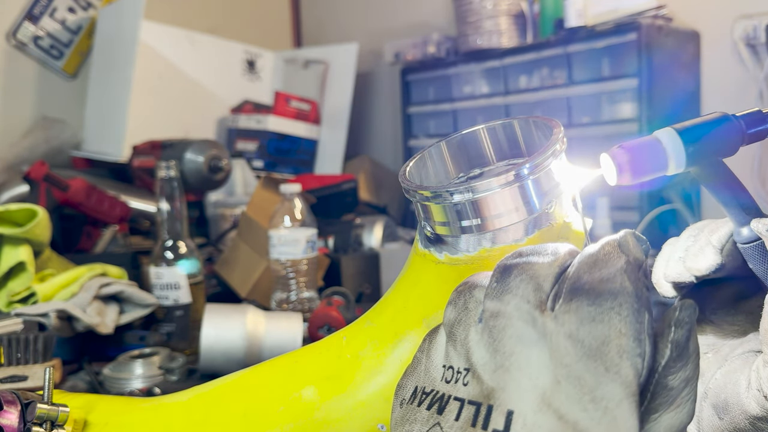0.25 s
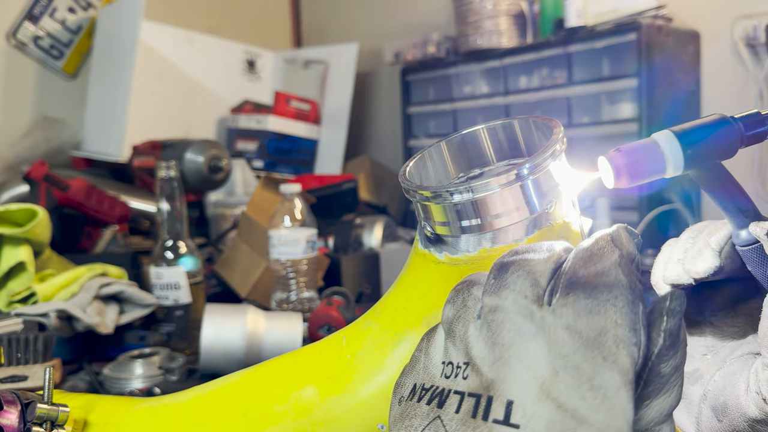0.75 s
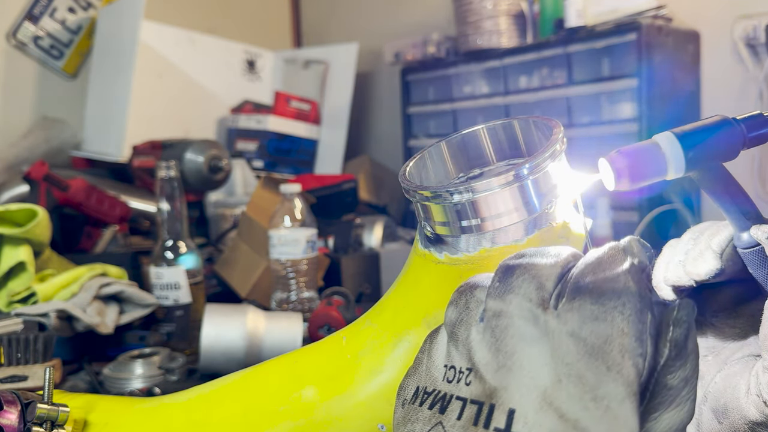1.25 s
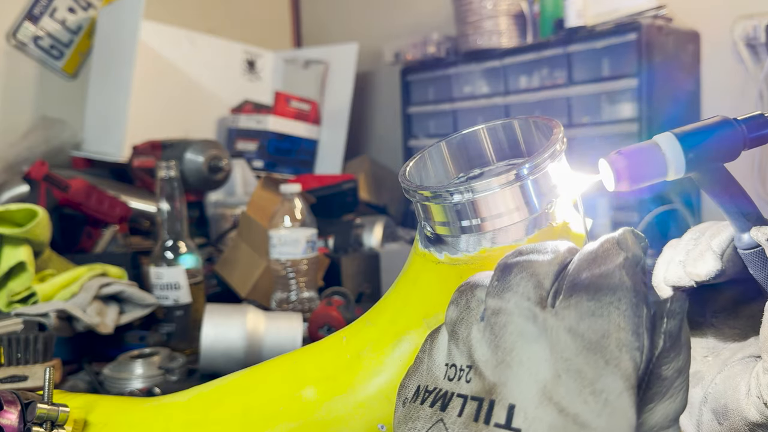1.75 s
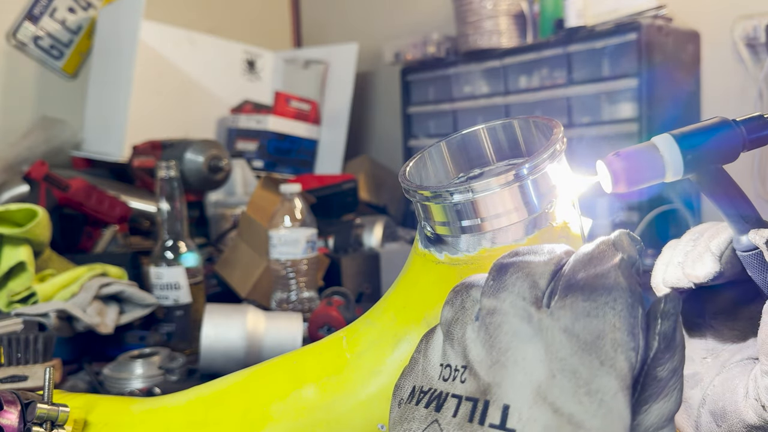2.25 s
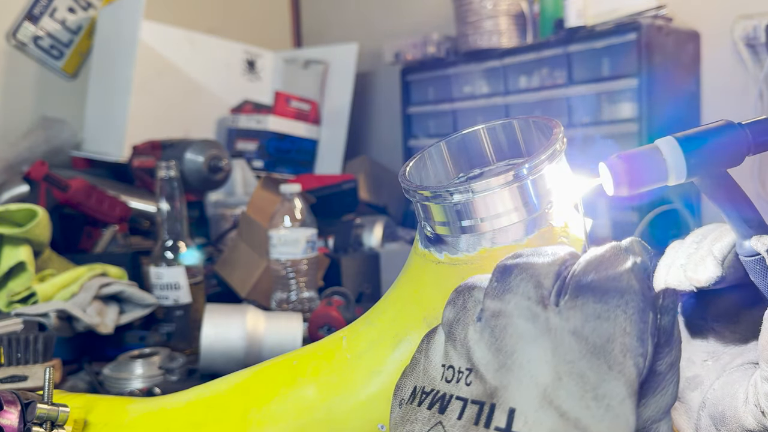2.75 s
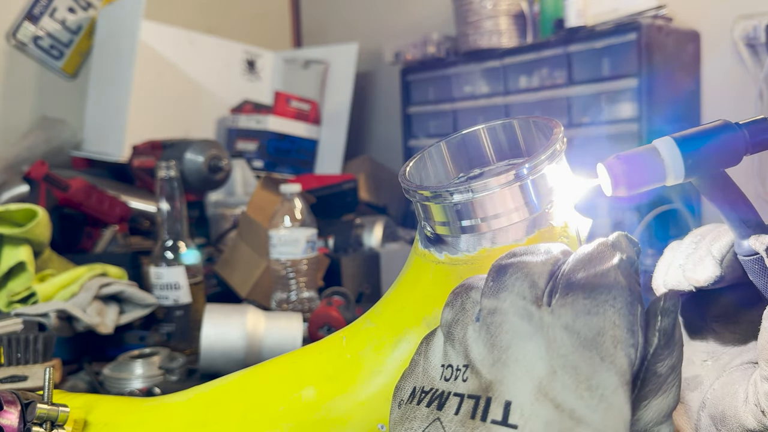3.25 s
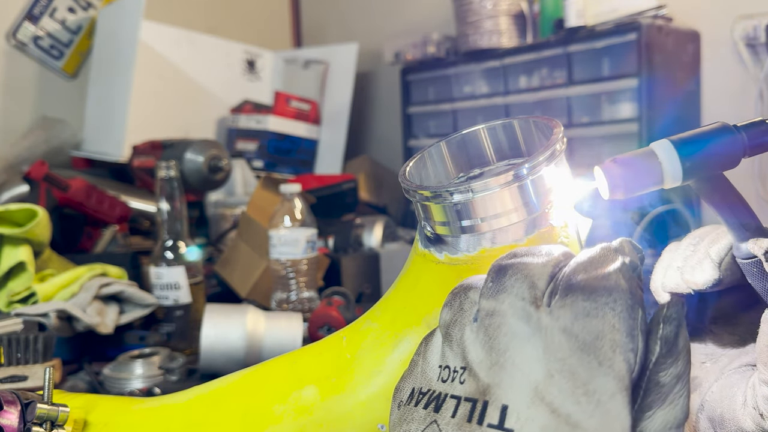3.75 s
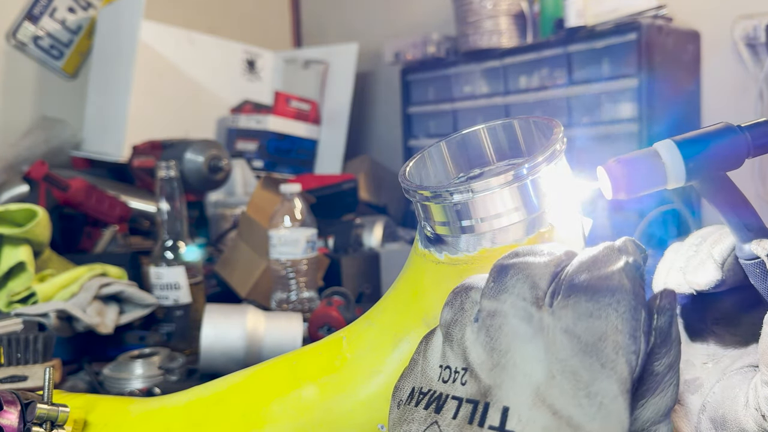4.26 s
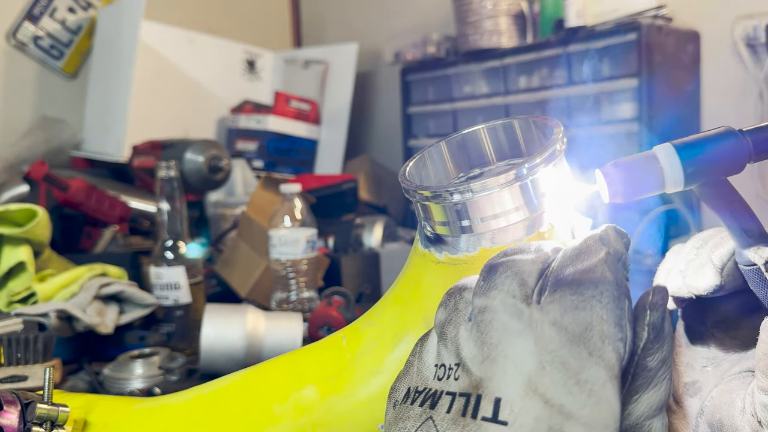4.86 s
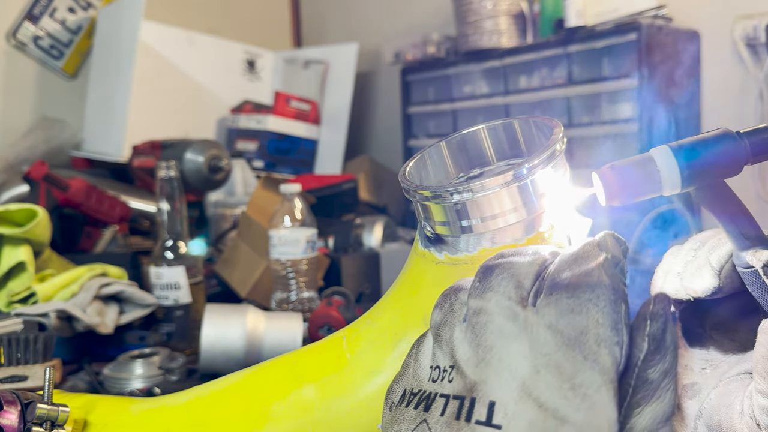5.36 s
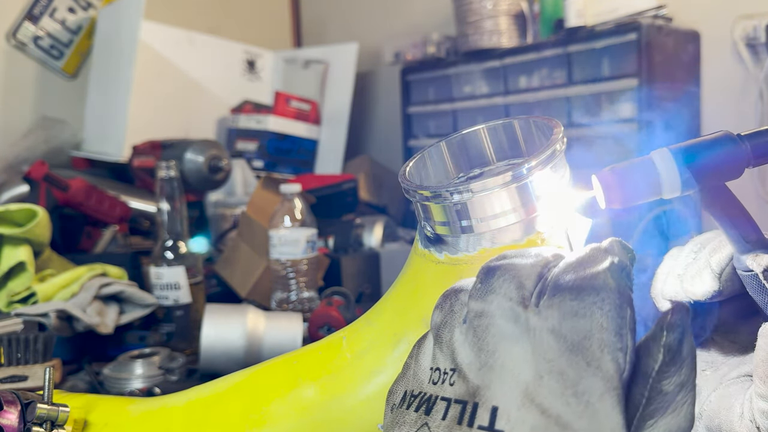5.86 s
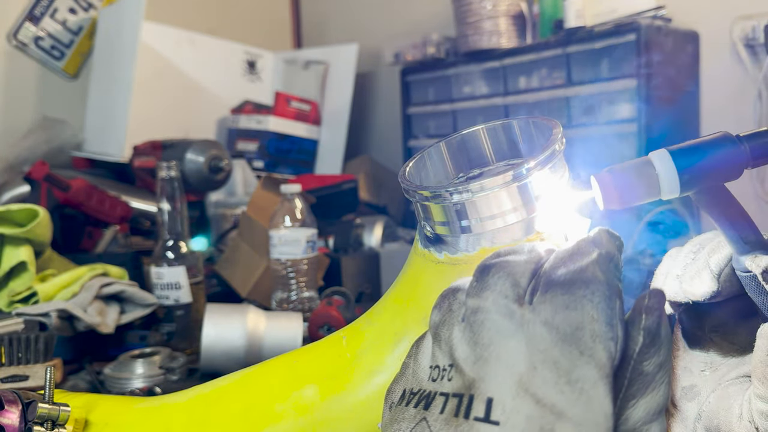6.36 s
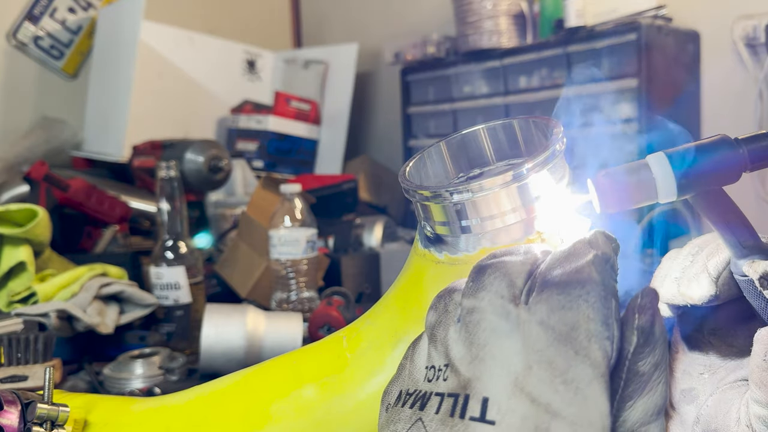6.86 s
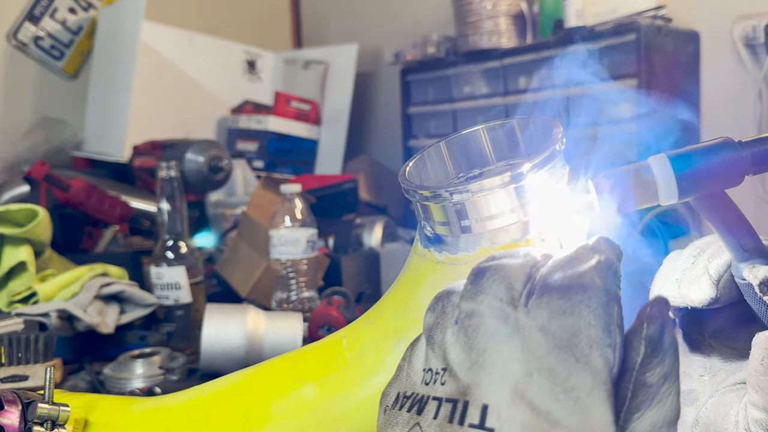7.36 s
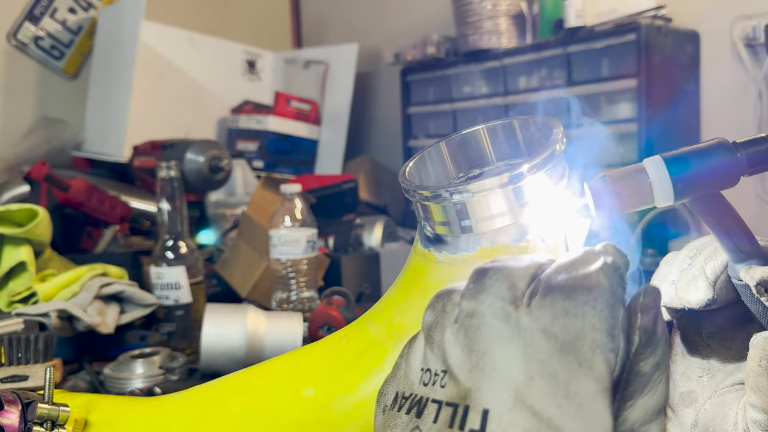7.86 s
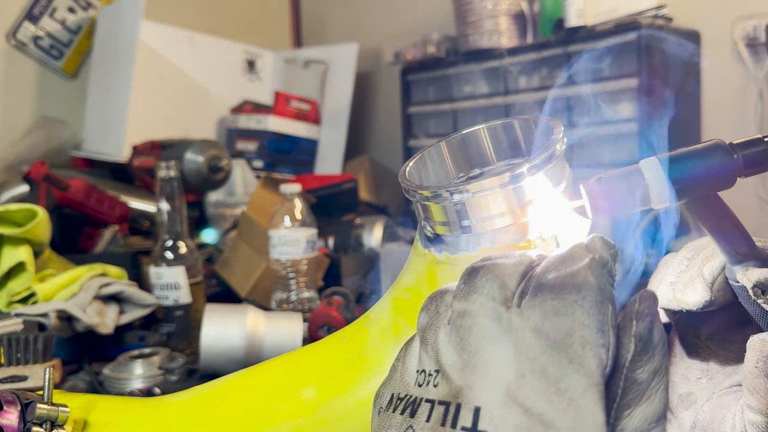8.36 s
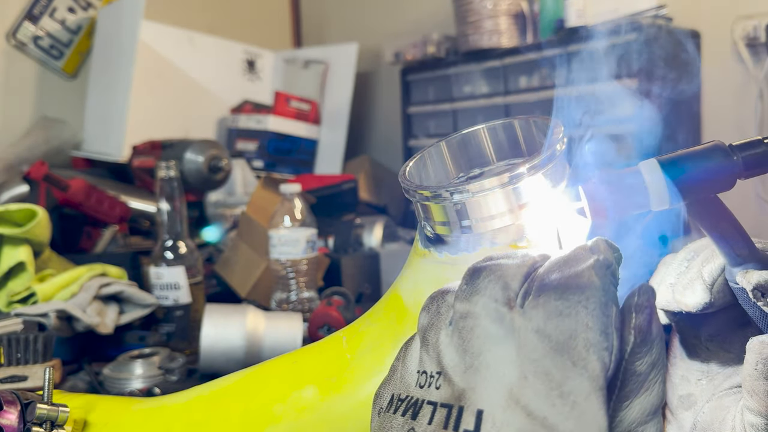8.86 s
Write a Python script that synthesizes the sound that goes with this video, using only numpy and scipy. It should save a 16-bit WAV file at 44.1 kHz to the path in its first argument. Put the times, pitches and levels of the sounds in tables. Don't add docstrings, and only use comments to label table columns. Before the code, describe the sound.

A close, loud welding arc buzzes harshly without pause over hissing gas, with faint machine hum and soft glove bumps on the bench later.

```python
import sys
import numpy as np
from scipy import signal
from scipy.fft import rfft, irfft, next_fast_len
from scipy.io import wavfile
from scipy.ndimage import uniform_filter1d

SR = 44100
rng = np.random.default_rng(int(sys.argv[2]) if len(sys.argv) > 2 else 0)


def int16_out(signal):
    q = np.round(np.clip(np.atleast_2d(signal).T, -1, 1) * 32767)
    wavfile.write(sys.argv[1], SR, q.astype(np.int16))


def ratio(d):
    e = np.asarray(d, float) / 20
    return 10 ** e


N = 401751
ARC_HZ = 120.2598
FILTER_SIZE = 2048

# time in seconds, level in dB.
ARC_LEVEL = [(0.0, -22), (1.37, -21.5), (2.2, -23), (2.79, -21.5), (4.06, -23.5), (4.31, -21.5),
             (5.2, -23.5), (6.24, -22), (6.57, -23), (7.59, -22), (7.97, -23), (9.11, -22)]
# time in seconds, place (0 seam start, 1 half way, 2 near the glove, 3 tilted over).
TORCH_PATH = [
    (0, 0),
    (1.2, 0),
    (5.0, 1),
    (7.3, 2),
    (7.75, 2),
    (7.95, 3),
    (9.11, 3),
]
# frequency in Hz, left level in dB, right level in dB.
SNAP_COLOUR = [(660, -86.5, -80.5), (1225, -69, -72), (1786, -82, -67.5), (2388, -66, -57),
               (3760, -45.5, -52.5), (4650, -51.5, -51.5), (7540, -57, -50.5), (7930, -51.5, -42.5),
               (9980, -50, -51), (10490, -53, -42), (12800, -50, -50), (14910, -53, -49.5),
               (16950, -66.5, -88.5)]
# frequency in Hz, gain in dB.
SECOND_COLOUR = [(700, 13), (2000, 19.5), (4000, -0.1), (6500, 3), (9000, -9.5), (12000, -8), (14500, -4),
                 (15700, 8)]
# frequency in Hz, left delay in ms, right delay in ms.
BAND_DELAY = [(1000.0, 0.234, 0.181), (3000.0, 0.057, 0.213), (5500.0, 0.262, 0.195),
              (7000.0, 0.191, 0.103), (8500.0, -0.725, -0.346), (10000.0, 0.031, -0.294),
              (15700.0, 0.069, -0.267)]
# delay in ms, signed gain at torch places 0, 1, 2 and 3.
LEFT_ECHOES = [(0.0, -1.01, -1.08, -1.02, -0.73), (0.096, -0.029, -0.016, -0.37, -0.54),
               (0.24, 0.36, 0.51, 0.43, 0.23), (0.324, -0.05, -0.2, -0.095, 0.094),
               (0.426, -0.66, -0.64, -0.49, -0.41), (0.486, -0.067, -0.093, -0.08, 0.13),
               (0.546, -0.49, -0.37, -0.58, -0.56), (0.648, -0.2, -0.2, -0.045, 0.025),
               (0.768, -0.2, -0.21, -0.34, -0.25), (0.846, 0.29, 0.2, 0.21, 0.2),
               (0.948, -0.19, -0.041, 0.3, 0.31), (1.032, 0.2, 0.28, 0.37, 0.33),
               (1.11, -0.33, -0.37, -0.19, -0.061), (4.164, 0.057, -0.016, -0.018, 0.0099),
               (6.228, 0.16, 0.1, -0.15, -0.14), (6.324, 0.3, 0.2, 0.17, 0.11),
               (6.45, 0.088, 0.011, 0.27, 0.17)]
# delay in ms, signed gain at torch places 0, 1, 2 and 3.
RIGHT_ECHOES = [(0.0, -0.82, -0.91, -1.1, -0.87), (0.088, 0.56, 0.57, 0.39, 0.18),
                (0.331, 0.23, 0.43, 0.27, 0.27), (0.417, -0.26, -0.25, -0.15, -0.073),
                (0.546, -0.081, -0.054, -0.16, -0.088), (0.632, -0.26, -0.085, -0.019, -0.12),
                (0.702, 0.095, 0.12, 0.13, 0.17), (0.948, -0.11, 0.14, 0.076, 0.037),
                (1.02, 0.16, 0.12, 0.15, 0.24), (1.148, 0.31, 0.14, 0.13, 0.089),
                (2.076, -0.29, -0.071, 0.06, 0.01), (4.165, 0.23, 0.1, 0.094, 0.057),
                (6.163, -0.01, -0.33, -0.16, -0.17), (6.22, -0.23, -0.14, -0.084, -0.035),
                (6.384, -0.00056, -0.088, 0.11, 0.062), (8.004, -0.067, -0.08, -0.25, -0.19)]
# time in seconds, treble change in dB.
SPITTING_SNAPS = [(0.153, 2), (1.55, -5), (2.706, 4), (3.596, 5), (3.621, 5.1), (3.696, 3.5), (3.978, 5),
                  (4.053, 4), (4.153, 6), (4.328, 3), (4.386, 4), (4.91, 7), (5.483, 5), (5.633, 4),
                  (5.907, -7), (6.215, 4), (7.072, -7), (7.113, 6), (7.853, -6), (7.895, 7), (7.978, 4),
                  (8.069, 5), (8.361, -3.6), (8.585, 4), (8.643, -7), (8.884, -3.3)]
# frequency in Hz, density in dB per Hz.
GAS_SPECTRUM = [(600, -21), (1000, -10.5), (1700, -6.5), (2200, -3.5), (4000, 2), (8000, 2.5), (9600, -1.5),
                (12000, -2.5), (13500, 3), (15500, -4)]
# frequency in Hz, width in Hz, depth (0-1) at the first
TORCH_DIPS = [(4150, 150, 1, 0.24), (9030, 410, 0.5, .2), (12650, 500, .7, 0.4), (15000, 1800, 0.7, 0.44),
              (5860, 100, 0.45, .05), (9360, 300, .4, .05)]
# frequency in Hz, density in dB per Hz.
SHOP_SPECTRUM = [(20, -19), (50, -21), (110, -11), (200, -1.5), (300, -6), (500, -16.5), (1200, -29.5)]
# frequency in Hz, density in dB per Hz.
FAN_AIR_SPECTRUM = [(200, -25.5), (400, 2.5), (700, 3.5), (1200, -1.5), (2500, -25)]
# multiple of the arc rate, level in dB, left minus right in dB, throb share (0-1),
# rise over the weld in dB.
HUM_PARTIALS = [(1, -63, 3, .05, -2), (2, -54, -3.5, 0.11, -3), (3, -55.5, -3, 0.22, 3),
                (4, -72.5, -1, 0.24, 5), (5, -73, -2, 0.045, 3.5), (6, -70, -3, .05, 9.5),
                (8, -62.5, 1, .05, 0.1)]
# frequency in Hz, density in dB per Hz.
RUMBLE_SPECTRUM = [(15, -6), (40, -7.5), (80, -3.5), (130, -2), (300, -30)]
# middle in seconds, length in seconds, rumble level in dB.
GLOVE_SHIFTS = [
    (3.499, 0.93, -63),
    (4.05, .3, -64),
    (4.751, 0.72, -58),
    (5.55, .6, -61),
    (6.201, .9, -60),
    (7.1, 0.5, -55),
    (8.5, 1.7, -60),
]
# time in seconds, peak level in dB.
BENCH_KNOCKS = [(3.289, -40), (3.359, -41), (3.469, -35), (3.599, -48), (4.49, -38), (4.619, -40),
                (4.702, -34.5), (4.769, -37), (4.859, -37), (7.048, -49), (8.049, -41), (8.349, -44)]
# start in seconds, end in seconds.
SILENT_SPELLS = [(0.06, 0.24), (0.26, 0.42), (0.44, 0.96), (0.97, 1.4), (1.42, 1.55), (1.7, 1.77),
                 (1.79, 1.84), (1.86, 1.91), (1.93, 2.02), (2.04, 2.14), (2.2, 2.42), (2.44, 2.49),
                 (2.93, 2.98), (3.16, 3.21), (7.89, 7.92)]
# low edge in Hz, high edge in Hz, last time in seconds, share (0-1) of other frames thinned.
THIN_BANDS = [(3930, 4050, 3.3, .5), (9440, 9680, 1.42, .15), (12280, 13050, 9, .3), (15100, 16000, 4, .35)]


def table(rows):
    return np.array(rows, float).T


def level(x, db):
    return x * ratio(db) / np.sqrt(np.mean(x ** 2))


def causal(hz, db):
    grid = np.fft.rfftfreq(FILTER_SIZE, 1 / SR) + 1
    log_gain = np.log(ratio(np.interp(np.log(grid), np.log(hz), db)))
    cepstrum = irfft(log_gain)
    cepstrum[1:FILTER_SIZE // 2] *= 2
    cepstrum[FILTER_SIZE // 2 + 1:] = 0
    return np.exp(rfft(cepstrum))


def coloured(x, rows):
    return signal.oaconvolve(x, irfft(causal(*table(rows))))[:N]


def walk(rate):
    hold = int(SR / rate)
    steps = np.repeat(rng.standard_normal(N // hold + 1), hold)
    return 1.24 * uniform_filter1d(steps, hold)[:N]


def wide_noise(rows, alike, db):
    mid = coloured(rng.standard_normal(N), rows)
    side = coloured(rng.standard_normal(N), rows) * np.array([[1], [-1]])
    alike = np.clip(alike, 0, 1)
    return level(np.sqrt(1 + alike) * mid + np.sqrt(1 - alike) * side, db)


def snaps(start_ms, unrest, scatter_db, jitter_us, crackle_db, crackle_ms, sharp_db=0):
    count = len(unrest)
    timing, strength = unrest * rng.standard_normal((count, 2)).T
    at = SR * (np.arange(count) / ARC_HZ + start_ms / 1000 + jitter_us * 1e-6 * timing)
    index = at.astype(int)[:, None] + np.arange(-15, 49)
    gap = index - at[:, None]
    click = np.sinc(gap) * np.cos(np.pi * np.clip(gap, -16, 16) / 32) ** 2
    decay = np.exp(-abs(gap) / (crackle_ms * SR / 1000))
    crackle = unrest[:, None] * rng.standard_normal(gap.shape) * decay
    plain, sharp = np.zeros((2, N + FILTER_SIZE))
    plain[index] = ratio(scatter_db * strength)[:, None] * click + ratio(crackle_db) * crackle
    sharp[index] = np.reshape(ratio(sharp_db) - 1, (-1, 1)) * click
    treble = signal.sosfilt(signal.butter(1, 2500, "high", fs=SR, output="sos"), sharp)
    return (plain + treble)[:N] * SR / ARC_HZ


def paths(port, echoes):
    grid = np.fft.rfftfreq(FILTER_SIZE, 1 / SR)
    colour, delay, (ms, *gains) = table(SNAP_COLOUR), table(BAND_DELAY), table(echoes)
    turns = np.cumsum(np.interp(grid, delay[0], delay[1 + port])) * grid[1] / 1000
    bounce = np.array(gains) @ np.exp(-2j * np.pi * np.outer(ms / 1000, grid))
    response = irfft(causal(colour[0], colour[1 + port]) * np.exp(-2j * np.pi * turns) * bounce)
    return np.roll(response, FILTER_SIZE // 8, axis=1)


def arc(place, unrest):
    first_ms, second_after_ms = 3.628, 2.071
    cycles = np.arange(int(N / SR * ARC_HZ))
    unrest = unrest[(cycles * SR / ARC_HZ).astype(int)]
    sharp_db = 1.1 * unrest * rng.standard_normal(len(unrest))
    spit_s, spit_db = table(SPITTING_SNAPS)
    sharp_db[(spit_s * ARC_HZ).astype(int)] = 0.83 * spit_db
    first = snaps(first_ms, unrest, scatter_db=-0.2, jitter_us=4.0, crackle_db=-21, crackle_ms=0.39,
                  sharp_db=sharp_db)
    second = snaps(first_ms + second_after_ms, unrest, scatter_db=-0.04, jitter_us=2.7,
                   crackle_db=-26, crackle_ms=0.39)
    both = (first + coloured(second, SECOND_COLOUR)) * ratio(0.17 * walk(25))
    shares = [both * np.clip(1 - abs(place - k), 0, 1) for k in range(4)]
    ports = []
    for port, echoes in enumerate((LEFT_ECHOES, RIGHT_ECHOES)):
        ports.append(sum(map(signal.oaconvolve, shares, paths(port, echoes))))
    start = FILTER_SIZE // 8
    buzz = np.array(ports)[:, start:start + N]
    return buzz


def walls(x, t60_s, gap_ms, wet_db):
    age = np.arange(SR // 5) / SR
    tail = rng.standard_normal((2, len(age))) * ratio(-60 * age / t60_s) * (age > gap_ms / 1000)
    tail *= ratio(wet_db) / np.sqrt(np.sum(tail ** 2, axis=1, keepdims=True))
    return signal.oaconvolve(x, tail, axes=1)[:, :N]


def shielding_gas(t):
    fade_db_per_s = -0.55
    hiss = wide_noise(GAS_SPECTRUM, alike=0.37, db=-32.5)
    return hiss * ratio(fade_db_per_s * t + 1.64 * walk(15))


def spectral_dips(x, place):
    for hz, width_hz, first, last in TORCH_DIPS:
        band = signal.lfilter(*signal.iirpeak(hz, hz / width_hz, fs=SR), x)
        depth = np.clip(first + (last - first) * place / 3, 0, 1)
        x = x - depth * band
    return x


def shop_air():
    return wide_noise(SHOP_SPECTRUM, alike=0.89, db=-54) * ratio(1.5 * walk(2.967))


def fan_air():
    return wide_noise(FAN_AIR_SPECTRUM, alike=0.14, db=-56.5)


def welder(t):
    fan_hz, in_step_s = 238.53, 4.31
    throb_hz, throb_peak_s = 1.33, 4.005
    turn = 2 * np.pi * (t - in_step_s)
    throb = np.cos(2 * np.pi * throb_hz * (t - throb_peak_s))
    sides = np.array([[1], [-1]]) / 2
    hum = 0
    for k, db, pan_db, share, rise_db in HUM_PARTIALS:
        gain = ratio(db + rise_db * t / t[-1] + 1.3 * walk(2.49) + pan_db * sides)
        hum = hum + gain * (1 + share * throb) * np.sin(k * ARC_HZ * turn)
    blade = ratio(-58 + 1.4 * walk(6.5)) * np.sin(fan_hz * turn)
    octave = ratio(-71.5) * np.sin(2 * fan_hz * turn)
    return np.sqrt(2) * (hum + blade + octave)


def rumble(t):
    swell = 0
    for s, length_s, db in GLOVE_SHIFTS:
        swell = swell + ratio(db) * np.cos(np.pi * np.clip((t - s) / length_s, -.5, .5)) ** 2
    noise = wide_noise(RUMBLE_SPECTRUM, alike=0.8, db=-1)
    return noise * (ratio(-66.5) + swell) * ratio(2.5 * walk(4.5))


def bumps(t):
    pitch_hz, t60_s, attack_s = 220.8, 0.18, 0.016
    out, age = np.zeros(N), t[:SR // 4]
    band = signal.butter(1, [pitch_hz / 4, pitch_hz * 3.4], "band", fs=SR, output="sos")
    envelope = ratio(-60 * age / t60_s) * np.minimum(age / attack_s, 1)
    for s, db in BENCH_KNOCKS:
        burst = signal.sosfilt(band, rng.standard_normal(len(age)) * envelope)
        out[int(s * SR):][:len(age)] += ratio(db) * burst / abs(burst).max()
    return out


def scene():
    t = np.arange(N) / SR
    place = np.interp(t, *table(TORCH_PATH))
    cold, hot, heat_up_s = 0.44, 0.89, 2.8
    unrest = hot - (hot - cold) * np.exp(-(t / heat_up_s) ** 2)
    buzz = arc(place, unrest) * ratio(np.interp(t, *table(ARC_LEVEL)) + 23.5)
    late = walls(buzz, t60_s=0.17, gap_ms=1.5, wet_db=-11.5)
    torch = spectral_dips(buzz + late + shielding_gas(t), place)
    return torch + shop_air() + fan_air() + welder(t) + rumble(t) + bumps(t)


def thin_weak_bands(x):
    top_hz, frame, margin_s = 15830, 1024, 0.008
    size = next_fast_len(N)
    grid = np.fft.rfftfreq(size, 1 / SR)
    whole = rfft(x, size) * (grid < top_hz)
    out = irfft(whole, size)[:, :N]
    for low_hz, high_hz, last_s, share in THIN_BANDS:
        frame_mute = np.clip(1.2 - rng.random(N // frame + 1) / share, 0, .7)
        mute = np.repeat(frame_mute, frame)[:N]
        for start, stop in SILENT_SPELLS:
            mute[int((start + margin_s) * SR):int((min(stop, last_s) - margin_s) * SR)] = 1
        mute = uniform_filter1d(uniform_filter1d(mute, frame // 4), frame // 4)
        band = irfft(whole * ((grid > low_hz) & (grid < high_hz)), size)[:, :N]
        out = out - band * mute
    return out


def top_cut(x):
    return signal.sosfilt(signal.butter(12, 16130, fs=SR, output="sos"), x)


def record(dry):
    mix = thin_weak_bands(dry)
    return top_cut(mix)


dry = scene()
out = record(dry)
int16_out(out)
```